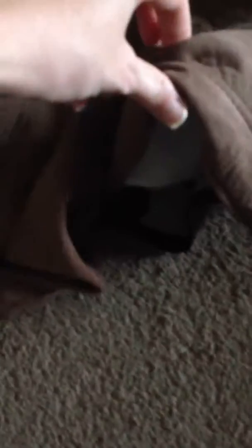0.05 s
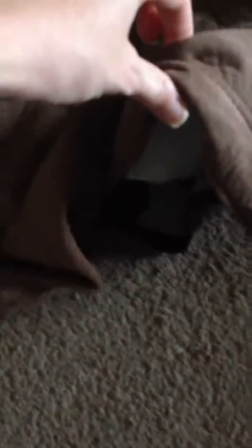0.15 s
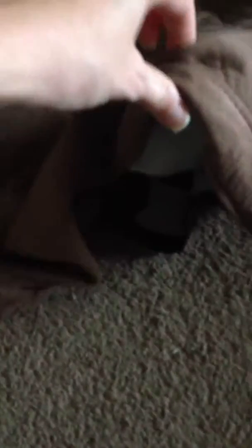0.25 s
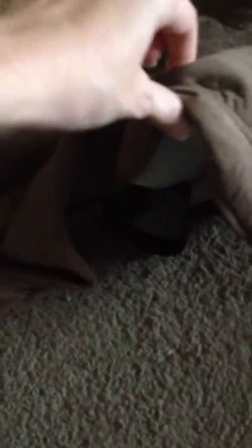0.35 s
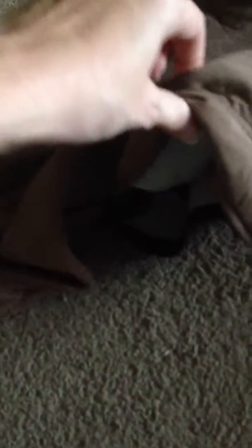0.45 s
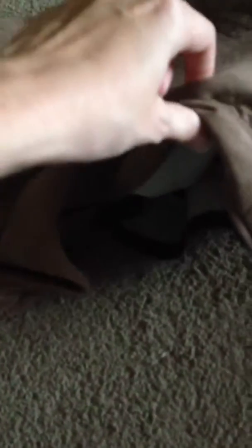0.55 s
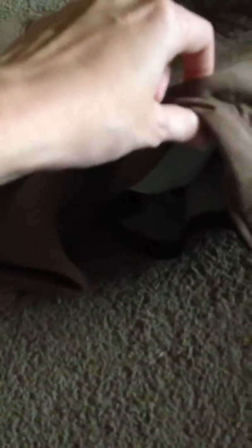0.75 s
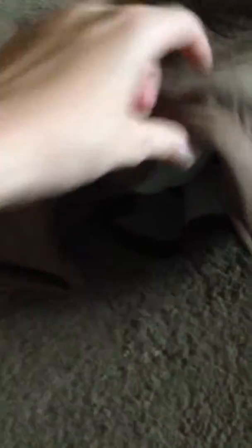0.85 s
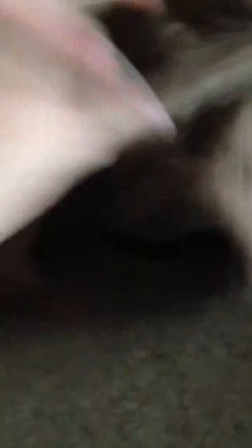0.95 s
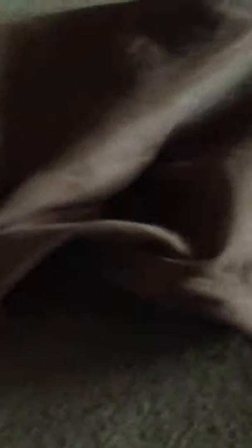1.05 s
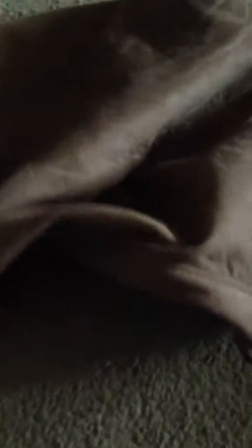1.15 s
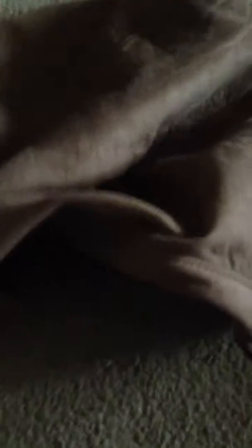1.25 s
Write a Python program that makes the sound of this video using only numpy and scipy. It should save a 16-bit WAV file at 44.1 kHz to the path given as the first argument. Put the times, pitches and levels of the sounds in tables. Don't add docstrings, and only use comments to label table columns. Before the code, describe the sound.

Close, slightly muffled squeaks from an unseen small animal indoors: two strong cries, a short one, a longer fading one, then two faint peeps, with low clucks, a tiny cloth rustle and brief room ring.

```python
import sys
import numpy as np
from scipy import signal
from scipy.fft import rfft, irfft
from scipy.io import wavfile
from scipy.ndimage import uniform_filter1d

SR = 44100
rng = np.random.default_rng(int(sys.argv[2]) if len(sys.argv) > 2 else 0)


def pcm_store(signal):
    levels = np.round(np.clip(np.atleast_2d(signal), -1, 1) * 32767)
    wavfile.write(sys.argv[1], SR, levels.astype(np.int16).T)


def decibels_to_gain(level_db):
    exponent = np.asarray(level_db, float) / 20
    return 10 ** exponent


N = 57330
TOP_HZ = 15500


def evened(x):
    return x / np.sqrt(np.mean(x ** 2) + 1e-20)


def read(points, hz):
    f, value = np.transpose(points)
    return np.interp(np.log(hz + 1), np.log(f + 1), value)


def add(mix, start_s, sound):
    part = mix[max(round(start_s * SR), 0):][:len(sound)]
    part += sound[:len(part)]


def resonate(x, hz, width_hz):
    return signal.lfilter(*signal.iirpeak(hz, hz / width_hz, SR), x)


def drift(n, per_s):
    smooth = np.exp(-2 * np.pi * per_s / SR)
    x = rng.standard_normal(8000)
    for _ in range(2):
        x = signal.lfilter([1], [1, -smooth], x)
    return evened(x[-5000 - n:][:n])


def coloured(db, n):
    spectrum = rfft(rng.standard_normal(n))
    return evened(irfft(spectrum * decibels_to_gain(db(np.fft.rfftfreq(n, 1 / SR))), n))


# (f [Hz], level [dB per Hz])
HISS_SPECTRUM = [(25, -29), (65, -10), (120, -4), (250, -12.5), (500, -18), (2000, -27.5), (3500, -26),
                 (15300, -33.5)]


def room_hiss():
    return decibels_to_gain(-60.5) * coloured(lambda f: read(HISS_SPECTRUM, f), N)


def hum():
    t = np.arange(N) / SR
    waver = evened(sum(np.sin(2 * np.pi * (f * t + rng.random())) for f in np.geomspace(2, 20, 12)))
    level_db = -57 + 1.05 * waver
    return np.sqrt(2) * decibels_to_gain(level_db) * np.sin(2 * np.pi * 120.1 * t)


# (f [Hz], level [dB])
EARLIER_RING = [(800, -61.5), (3280, -60), (5000, -86)]


def earlier_cry():
    t = np.arange(N) / SR
    fade_db = -60 * t / 0.24
    ring = np.zeros(N)
    for hz, db in EARLIER_RING:
        ring += decibels_to_gain(db + fade_db) * evened(resonate(rng.standard_normal(N), hz, 29))
    return ring


def cluck(length_s, db, ring_hz, chest_db):
    pulses_per_s, throat_width_hz, chest_hz, fade_db = 260, 185, 270, -4
    timing, strength = rng.random((2, 12))
    at = (np.cumsum(.5 + timing) - .5 - timing[0]) / pulses_per_s
    pulses = np.zeros(4000)
    size = (0.66 + 0.66 * strength) * (at < length_s) * decibels_to_gain(fade_db * at / length_s)
    pulses[(abs(at) * SR).astype(int)] = size
    soften = signal.butter(4, 1250, fs=SR, output="sos")
    pulses = signal.sosfilt(soften, pulses)
    throat = resonate(resonate(pulses, ring_hz, throat_width_hz), ring_hz, 3 * throat_width_hz)
    chest = resonate(resonate(pulses, chest_hz, 230), chest_hz, 220)
    return decibels_to_gain(db) * (throat + decibels_to_gain(chest_db) * chest) * 60


# (t [s], length [s], level [dB], throat ring f [Hz], chest level [dB])
CLUCK_EVENTS = [
    (.0, 0.011, -58, 270, 12.5),
    (0.159, 0.027, -47.5, 722, -1),
    (0.215, 0.0058, -51, 1510, -15),
    (0.258, 0.021, -41, 780, -35),
    (0.299, 0.024, -44, 342, -22),
    (0.775, 0.0245, -43, 772, -4),
    (0.911, 0.018, -35, 806, -12.5),
    (1.108, 0.021, -44, 695, 1),
]


def clucks(mix):
    for start_s, *settings in CLUCK_EVENTS:
        add(mix, start_s, cluck(*settings))


def rustle():
    t, noise = np.arange(N) / SR, rng.standard_normal(N)
    hiss = resonate(noise, 3950, 490) + resonate(noise, 5100, 1200)
    middle_s, width_s = 0.1184, 0.011
    return decibels_to_gain(-58) * evened(hiss) * np.exp(-.5 * ((t - middle_s) / width_s) ** 2)


# (f [Hz], level [dB])
THROAT_COLOUR = [(1000, -11.5), (1500, -13), (2600, 2.5), (4200, -3.5), (5600, -10), (7200, -24),
                 (9500, -32), (15000, -51.5)]


def colour_db(hz, dip_hz, dip_db, treble_db, upper_hz, upper_db):
    width_hz, treble_hz = 400, 6050
    dip = np.exp(-.5 * ((hz - dip_hz) / width_hz) ** 2)
    upper = np.exp(-.5 * ((hz - upper_hz) / width_hz) ** 2)
    treble = 1 / (1 + (treble_hz / (hz + 1)) ** 6)
    return read(THROAT_COLOUR, hz) + dip_db * dip + upper_db * upper + treble_db * treble


def harmonic_sizes(k, hz, tilt_db, rough, first_db, mouth):
    size_db = colour_db(k * hz, *mouth)
    size_db = size_db + tilt_db * np.log2(np.minimum(k, 5) / 2) + first_db * (k == 1)
    smear_db = 2.5 * rough * np.maximum(k - 5, 0)
    size = decibels_to_gain(size_db - smear_db) * (k * hz < TOP_HZ)
    size = size / np.sqrt((size ** 2).sum(0) / 2)
    slow, fast = (np.array([drift(len(hz), per_s) for _ in k]) for per_s in (40, 110))
    shimmer_db = 0.91 * np.minimum(k, 5) ** 0.57 * slow
    flutter_db = 11.5 * rough * np.sqrt(k / 1.27) * np.tanh(fast)
    return size * decibels_to_gain(shimmer_db + flutter_db)


def breath_puffs(turns, hz, tilt_db, treble_db, dip_hz, dip_db, upper_hz, upper_db):
    def spectrum_db(f):
        low_cut_db = 10 * np.log10(1 + (1220 / (f + 1)) ** 12)
        tilt = tilt_db.mean() * np.log2(f / hz.mean() + 1)
        return colour_db(f, dip_hz, dip_db, treble_db, upper_hz, upper_db) + tilt - low_cut_db

    puffs = coloured(spectrum_db, 6000)[:len(hz)]
    return puffs * (1 + 0.043 * np.cos(2 * np.pi * turns))


def note(rows, attack_s, dip_hz, dip_db, first_db, treble_db, upper_hz, upper_db, rasp_db):
    s, *columns = np.transpose(rows)
    s = np.maximum.accumulate(s)
    t = np.arange(s[0], s[-1], 1 / SR)[:5900]
    curves = [uniform_filter1d(np.interp(t, s, c), size=45, mode="nearest") for c in columns]
    hz, db, rough, tilt_db = curves
    rough = np.clip(rough, 0, 1)
    jitter = 0.033 * rough * drift(len(t), 340)
    turns = np.cumsum(hz * (1 + jitter)) / SR

    k = np.arange(1, 14)[:, None]
    mouth = (dip_hz, dip_db, treble_db, upper_hz, upper_db)
    size = harmonic_sizes(k, hz, tilt_db, rough, first_db, mouth)
    voice = (size * np.cos(2 * np.pi * (k * turns + rng.random(k.shape)))).sum(0)
    puffs = breath_puffs(turns, hz, tilt_db, treble_db + rasp_db, dip_hz, dip_db, upper_hz, upper_db)

    release_s = 0.0031
    ramp = np.minimum((t - t[0]) / attack_s, (t[-1] - t) / release_s)
    edges = np.sin(np.pi / 2 * np.clip(ramp, 0, 1)) ** 2
    return s[0], edges * decibels_to_gain(db) * (voice + 0.75 * rough * puffs)


# (t [s], pitch f [Hz], level [dB], roughness [0-1], tilt [dB per octave])
FIRST_NOTES = [
    [(.224, 1213, -64.5, 0.1, -3), (.233, 1206, -54.5, 0.1, -5), (.2365, 1189, -29.5, 0.16, -3),
     (.271, 1247, -27, 0.12, -0.5), (.293, 1244, -29.5, 0.08, -1), (.317, 1450, -24, .09, 1),
     (.334, 1392, -20.5, 0.15, 3), (.341, 1444, -27.5, 0.3, 4), (.355, 1435, -27, 0, 6)],
    [(.336, 1530, -21.5, 0.38, -4), (.345, 1622, -22.5, 0.32, -8), (.3545, 1740, -24, 0.23, -4),
     (.361, 1676, -30.5, 0.2, 0), (.367, 1290, -37, 0.1, -19)],
]
SECOND_NOTES = [
    [(.4535, 1490, -36, 0.26, -15), (.456, 1243, -24, 0.075, 5), (.464, 1246, -18.5, 0.11, 1),
     (.472, 1384, -24.5, 0.26, 4.3), (.477, 1444, -17.5, 0.13, -2), (.484, 1329, -19.5, 0.024, 2.5),
     (.511, 1286, -20, 0.056, 2), (.517, 1440, -19.5, 0.11, -1)],
    [(.5125, 1540, -21.5, 0.15, -6), (.518, 1704, -22, 0.3, -7), (.531, 1696, -28.5, 0.091, -3),
     (.539, 1623, -31.5, 0.03, -2.5), (.544, 1510, -44, 0.24, -12)],
]
SHORT_NOTES = [
    [(.6262, 1270, -41, 0.13, -7), (.6282, 1186, -30, 0.054, -10), (.636, 1170, -23.5, 0.019, -9.5),
     (.643, 1192, -28.5, 0.1, -19.5), (.649, 1310, -33, 0.19, 0)],
    [(.647, 1434, -46.5, 0.49, 0), (.655, 1511, -36.5, 0.41, -1.5), (.664, 1423, -45, 0.72, -8),
     (.672, 1260, -36, 0.29, -23)],
]
LONG_NOTES = [
    [(.778, 1256, -59, 0.055, -15), (.7875, 1250, -75, 0.065, -11), (.79, 1237, -32.5, 0.15, 1),
     (.812, 1224, -30, 0.071, 6), (.822, 1325, -31, 0.17, 0), (.836, 1244, -30.5, 0.057, -1),
     (.853, 1367, -30, 0.038, 1.5), (.869, 1309, -33, 0.057, 4.5), (.895, 1446, -37, 0.21, -9)],
    [(.872, 1482, -29, 0.15, -2), (.89, 1452, -36, 0.3, -4.5), (.904, 1481, -38.5, 0.24, -8),
     (.924, 1451, -39, 0.19, -9.5), (.94, 1495, -41, 0.13, -6), (.955, 1466, -37, 0.039, -10.5),
     (.968, 1397, -47.5, 0.049, 2), (.977, 1250, -38, 0.081, -18)],
]
PEEP_NOTES = [
    [(1.1365, 1305, -67, 0.62, 8), (1.14, 1186, -34.5, 0.11, -3), (1.151, 1227, -36, 0.24, -10),
     (1.157, 1160, -46, 0.22, 0.5), (1.166, 1020, -42.5, 0.05, -43)],
    [(1.292, 1320, -53, 0.97, -21), (1.2945, 1401, -42, 0.89, -14.5), (1.304, 1374, -40.5, 0.33, 5)],
]
# (dip f [Hz], dip level [dB], fundamental [dB], treble [dB],
# upper notch or peak f [Hz], its level [dB], extra treble rasp [dB])
MOUTH_SHAPES = [
    (5680, -8.5, 5, 7, 8370, -6, 7),
    (6260, -5, 1, 6, 5900, -9, 13),
    (5830, -17.5, -3, 2.5, 8040, -10, -2),
    (5600, -15, -4, -7, 6800, 10, 10),
    (4000, -12.5, -17, 5.5, 7700, 0, 8),
    (6050, -4, 0.5, -3.5, 7500, 13, 23),
    (5980, -16.5, -1.5, -8, 7500, -6, 0),
    (5980, -7, 7.5, 6, 7160, 7.5, -3),
    (6200, -23, 5, 5.5, 4800, 2.5, 16),
    (6100, -9, 8.5, -29, 5900, -1, 0),
]
NOTE_ATTACKS = [.0007, .003, .0007, .0012, .0007, .003, .0007, .016, .0007, .0007]
HEAD_TURNS = [1, -2.5, -0.5, 0.5, -1.5, 3.5, 5.5, 7.5, 2, 1]


def cries(near, spread):
    notes = FIRST_NOTES + SECOND_NOTES + SHORT_NOTES + LONG_NOTES + PEEP_NOTES
    for rows, attack_s, mouth, turned_db in zip(notes, NOTE_ATTACKS, MOUTH_SHAPES, HEAD_TURNS):
        start_s, sound = note(rows, attack_s, *mouth)
        add(near, start_s, sound)
        add(spread, start_s, decibels_to_gain(turned_db) * sound)


# (t [s], level [dB], ring f [Hz], width [Hz])
SNAP_EVENTS = [
    (0.2348, -33, 1670, 1500),
    (.3365, -28, 3000, 2200),
    (0.4739, -27, 3000, 1500),
    (0.5158, -33, 3750, 2500),
    (.648, -31, 3500, 2500),
    (1.1388, -28.5, 2920, 1100),
    (1.2935, -45, 2900, 1800),
]


def snaps(mix):
    t = np.arange(400) / SR
    for start_s, db, hz, width_hz in SNAP_EVENTS:
        swell = 3 * np.pi * width_hz * t * np.exp(-np.pi * width_hz * t)
        add(mix, start_s, decibels_to_gain(db) * swell * np.sin(2 * np.pi * hz * t))


# (delay t [s], level [dB])
REFLECTIONS = [(.0023, -23), (.0061, -37), (.0113, -32), (.017, -25), (.024, -26)]
# (f [Hz], t60 [s])
ROOM_DECAY = [(500, 0.38), (1500, 0.26), (3000, 0.22), (6000, 0.22), (12000, 0.27)]


def room(direct, spread):
    start_s, rise_s, tail_db = 0.0027, 0.014, -12
    late_db, late_longer = -10, 2.09
    taps = np.zeros(SR // 2)
    at = np.arange(0, SR // 2 - 20, 20)
    taps[at + rng.integers(0, 20, len(at))] = rng.choice([-1., 1.], len(at))
    taps[:round(start_s * SR)] = 0
    hz, t, z = signal.stft(taps, SR, nperseg=256)
    fall_db = -60 * t / read(ROOM_DECAY, hz)[:, None]
    decay = np.hypot(decibels_to_gain(fall_db), decibels_to_gain(late_db + fall_db / late_longer))
    tail = signal.istft(z * decay, SR, nperseg=256)[1]
    tail = tail * (1 - np.exp(-np.arange(len(tail)) / SR / rise_s))
    tail = decibels_to_gain(tail_db) * tail / np.linalg.norm(tail)
    for k, (delay_s, db) in enumerate(REFLECTIONS):
        tail[round(delay_s * SR)] += (-1) ** k * decibels_to_gain(db)
    return direct + signal.fftconvolve(spread, tail)[:N]


def scene():
    near = rustle()
    clucks(near)
    snaps(near)
    spread = near.copy()
    cries(near, spread)
    mix = room(near, spread) + earlier_cry() + hum() + room_hiss()
    return mix[None]


def top_cut(x):
    return signal.sosfilt(signal.butter(12, 15450, fs=SR, output="sos"), x)


def record(dry):
    low_pass = signal.firwin(511, TOP_HZ, window=("kaiser", 9), fs=SR)
    mix = signal.oaconvolve(dry, low_pass[None], "same")
    return top_cut(mix)


dry = scene()
out = record(dry)
pcm_store(out)
```